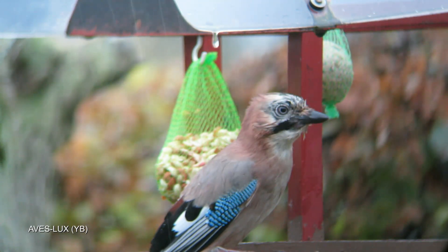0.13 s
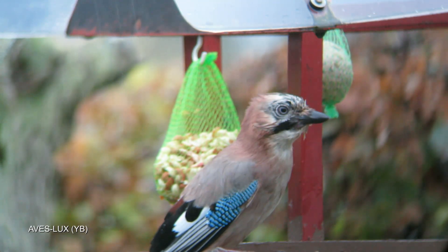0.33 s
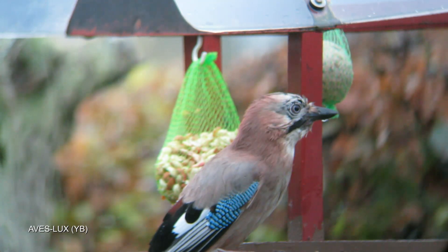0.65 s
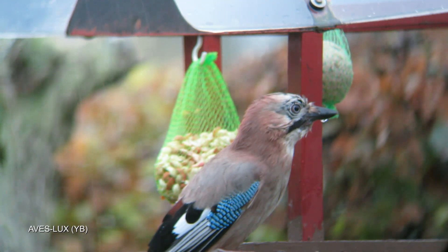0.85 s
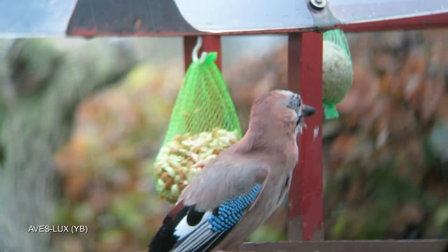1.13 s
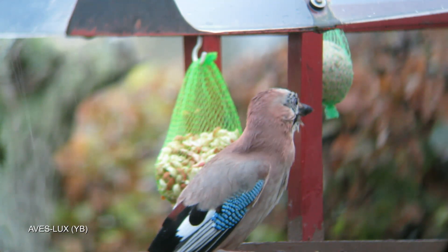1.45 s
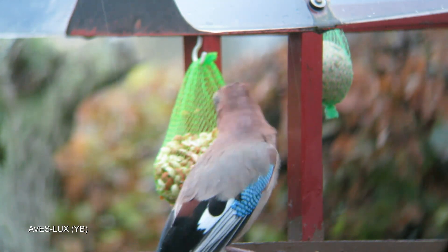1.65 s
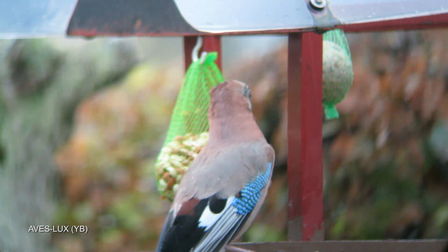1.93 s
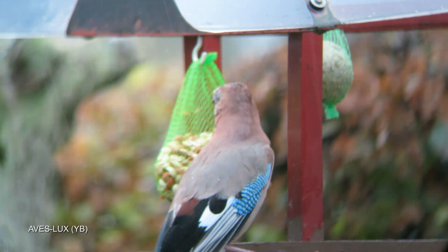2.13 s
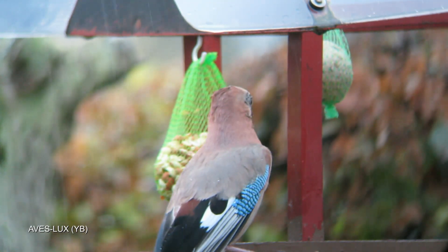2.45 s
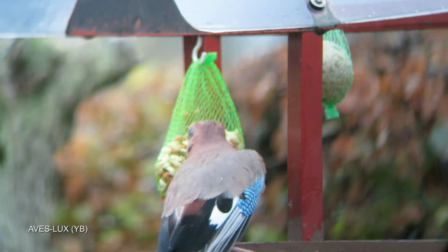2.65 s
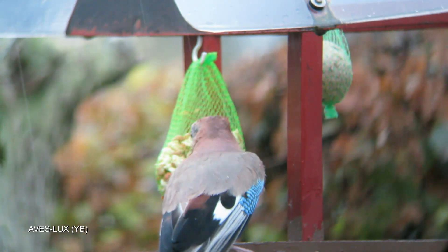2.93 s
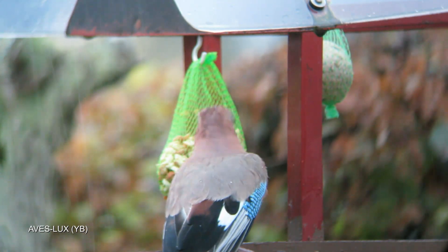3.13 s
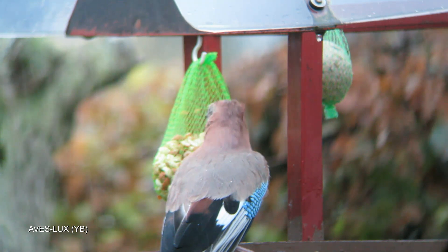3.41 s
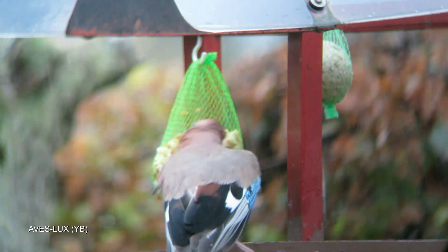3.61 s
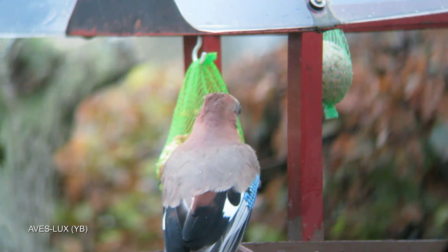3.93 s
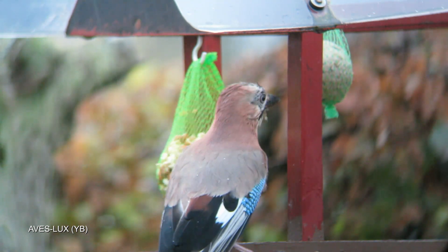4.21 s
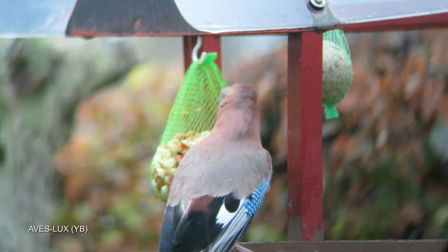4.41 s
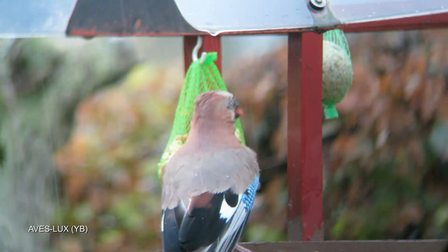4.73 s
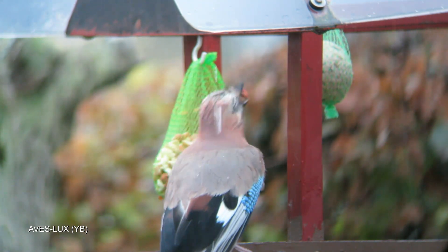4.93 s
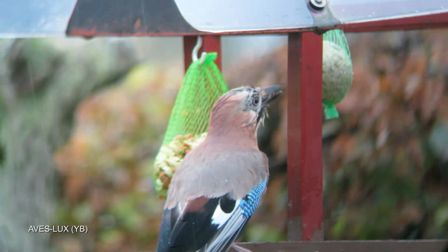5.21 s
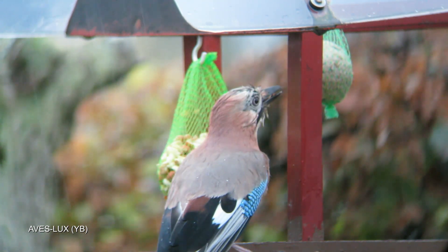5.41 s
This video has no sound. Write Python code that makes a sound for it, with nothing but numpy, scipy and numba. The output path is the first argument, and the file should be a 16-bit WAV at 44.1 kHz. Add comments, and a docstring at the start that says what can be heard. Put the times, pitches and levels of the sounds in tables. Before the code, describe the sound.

Outdoors in a quiet garden, loud raspy jay calls come singly and irregularly, each under half a second or slightly longer, tearing and nasal, ending in a rough rattle. Softer hoarse calls from another jay fill the gaps with long woodland reverberation. Faint drips, one tiny high bird peep late on, low hum and thin hiss complete the close recording.

```python
"""Jays screeching in a garden

The near jay gives six rasping calls, the first already under way: hoarse opening, rising buzz with
whistling partials, rattle. Both jays are a syrinx of partials and turbulence, coloured by spectra.
Another answers, smeared by trees. Drips and a peep are sine tones; a faint low tone arches far away.
Under it all lie filtered noise, wavering hum tones and a thin hiss of changing level."""
import sys
import numpy as np
from scipy import signal
from scipy.fft import rfft, irfft
from scipy.io import wavfile
from scipy.ndimage import uniform_filter1d
from numba import njit

SR = 44100
rng = np.random.default_rng(int(sys.argv[2]) if len(sys.argv) > 2 else 0)


def generate_wav(sig):
    """Save sig (samples, or channels by samples) to the path in sys.argv[1] as 16-bit PCM at SR."""
    pcm = np.round(np.clip(np.atleast_2d(sig).T, -1, 1) * 32767).astype(np.int16)
    wavfile.write(sys.argv[1], SR, pcm)


N = 245637
T = np.arange(N) / SR

# steady air spectrum, relative: freq_hz, gain_db
AIR_SPECTRUM = [(25, -2.5), (90, -9.5), (250, -2.5), (400, -10.5), (700, 3.5), (3000, 9), (8400, -15),
                (10800, -7.5), (12200, -36.5), (14000, -27.5)]
AIR_RMS_DB = -56.5
# hum tones, mean level before wavering: freq_hz, rms_db
HUM_TONES = [(100, -88), (150, -93), (232, -85), (268, -90)]
# high hiss, level before its trim: time_s, level_db
HISS_LEVEL = [(0.03, -66), (0.29, -78), (1.39, -66.5), (1.89, -80.5), (2.16, -69), (2.38, -82), (2.59, -66),
              (2.95, -68.5), (3.11, -75.5), (3.82, -69.5), (3.94, -63.5), (4.72, -76.5), (5.09, -69.5),
              (5.54, -66)]
# faint distant tone: time_s, pitch_hz
ARCH_PITCH = [(3.1, 512), (3.17, 561), (3.24, 600), (3.3, 577), (3.36, 570)]
# drips on the feeder, level before colouring: start_s, peak_db, ring_hz, t60_s
DRIP_EVENTS = [(.241, -25.5, 2130, .05), (3.362, -30, 2703, 0.007)]

# far jay's calls: start_s, length_s, level_db (before the trees), top_pitch_hz, treble_share_db
FAR_CALLS = [(.21, 0.21, -30.5, 309.1, -2.5), (.57, 0.37, -30, 301.5, -13.5), (1.1, .3, -32.5, 313.6, -4),
             (1.44, .33, -32.5, 273.6, -5.5), (2.31, 0.23, -33, 300, -4.5), (2.7, 0.24, -33.5, 304.8, -7),
             (3.338, 0.32, -30, 298.7, -5), (4.375, 0.4, -28, 305.4, -3), (4.93, 0.2, -28, 296.1, -6)]
# far jay's colour through the trees: freq_hz, gain_db
FAR_SPECTRUM = [(240, -55), (400, -53), (687, -39), (878, -20.5), (1180, -10.5), (1300, -11), (1450, -9.5),
                (2000, -6.5), (2380, -2.5), (2790, -5), (3040, -1), (3610, -3.5), (3940, -10),
                (4910, -15.5), (7550, -42), (9820, -97), (16600, -120)]
FAR_RISE_S, FAR_ATTACK_S, FAR_RELEASE_S = .15, .04, .008  # pitch climb; envelope edges
WOOD_T60_S, WOOD_TREBLE_T60_S = 1.85, 1.2  # ringing of the trees

# near jay's calls, level before swell, push and sag; treble added to the beak's share:
# start_s, opening_s, buzz_s, rattle_s, attack_s, fray_s, level_db, lock_pitch_hz, climb_hz_per_s,
# rattle_pitch_hz, rattle_drift_hz_per_s, treble_db, whistle_db
NEAR_CALLS = [(-.25, 0.1, .14, 0.2, .04, .11, -17.5, 311.3, 180.8, 335.7, -60, 3, -4.5),
              (.662, 0.11, .11, .305, 0.026, 0.0788, -20.5, 278.9, 190.2, 310.4, 50, 2, -3),
              (1.868, 0.12, 0.11, 0.21, 0.059, .19, -20.5, 274, 236.7, 319.7, 150, -1.5, 0.5),
              (2.445, .09, .11, .17, 0.072, .1, -19.5, 284.2, 150.6, 302, 40.5, -0.5, -1),
              (3.762, .108, .083, 0.16, 0.047, 0.0457, -18, 282.6, 154.8, 316.7, 60, -2, -0.5),
              (5.424, 0.072, 0.076, .2, 0.012, .12, -22, 279.8, 178.2, 314.8, 0, 5, 1)]
# narrow throat resonances that make even partials whistle, gain before whistle_db:
# centre_hz, width_hz, narrow_beak_db, wide_beak_db
WHISTLE_RESONANCES = [(1593, 130, 0.5, -6.5), (1953, 83, -8.5, 4.5), (2242, 280, -3, -6),
                      (2900, 66, -24, -4), (3350, 383, -15.5, -2.5), (3610, 86, -30, -9),
                      (4020, 110, -8.5, -18), (4210, 190, -22, -11.5)]
# near jay's throat and beak: freq_hz, gain_db
THROAT_SPECTRUM = [(240, -85.5), (400, -38), (704, -34), (946, -12), (1060, -14.5), (1570, -3), (1810, -8),
                   (1950, -3), (2320, 2.5), (3400, 0.5), (3890, -6.5), (4730, -5), (5290, -16), (6510, -21),
                   (7550, -37), (9820, -53.5), (16600, -120)]
OPENING_HZ = 244.2  # starting pitch of both jays' calls
LEAP_S, LOCK_S = .035, .035  # leap to the rattle pitch; locking of the buzz
OPENING_ROUGH, BUZZ_ROUGH, RATTLE_ROUGH = .64, .18, .85  # 0-1
BEAK_SNAP = .35  # share of the beak's closing that comes as the voice frays
SWELL_DB, PUSH_DB, SAG_DB, RELEASE_S = 3.5, 0.5, 0.5, 0.041  # swell, push on fraying, running out of air
NARROW_BEAK_HZ, WIDE_BEAK_HZ = 2450, 2912  # main throat resonance
NARROW_TREBLE_DB, WIDE_TREBLE_DB = -15.5, -5.5  # treble share before each call's treble_db
TOP_HZ = 15000  # microphone's upper limit


def undb(db):
    """Decibels to gain."""
    return 10 ** (np.asarray(db) / 20)


def unit(x):
    """Scale to rms 1."""
    return x / np.sqrt(np.mean(x ** 2))


def curves(rows):
    """Columns of a (time_s, ...) table, joined by straight lines."""
    time_s, *columns = np.transpose(rows)
    return [np.interp(T, time_s, column) for column in columns]


def current(rows):
    """Columns of an event table, each moment holding the row that started last."""
    rows = np.array(rows)
    index = np.maximum(np.searchsorted(rows[:, 0], T) - 1, 0)
    return rows[index].T


def gate(start_s, end_s, fade_s):
    """1 between two times, with sloping edges."""
    return np.clip(np.minimum(T - start_s, end_s - T) / fade_s + .5, 0, 1)


def ramp(start_s, length_s):
    """Rise from 0 to 1 in a given time."""
    return np.clip((T - start_s) / length_s, 0, 1)


def cycles(hz):
    """Phase in radians of a moving pitch."""
    return 2 * np.pi * np.cumsum(hz) / SR


def noise():
    """White noise."""
    return rng.standard_normal(N)


def wander(hz):
    """Low-passed random motion, rms 1."""
    return unit(signal.sosfilt(signal.butter(2, hz, fs=SR, output="sos"), noise()))


def steady(x):
    """Even out slow swells, keeping the rms near 1."""
    return x / np.sqrt(uniform_filter1d(x ** 2, size=900) + 1e-12)


def colour(x, points):
    """Filter by a (freq_hz, gain_db) spectrum, interpolated over log frequency."""
    hz, db = np.transpose(points)
    f = np.maximum(np.fft.rfftfreq(2 * N, 1 / SR), 1)
    gain = undb(np.interp(np.log(f), np.log(hz), db))
    return irfft(rfft(x, 2 * N) * gain)[:N]


def treble(x, hz):
    """High-pass without phase shift."""
    return signal.sosfiltfilt(signal.butter(3, hz, "high", fs=SR, output="sos"), x)


@njit
def resonate(x, hz, width_hz):
    """State-variable band-pass with a moving centre, gain 1 there."""
    y, band, low = np.empty(len(x)), 0., 0.
    for i in range(len(x)):
        g, damping = np.tan(np.pi * hz[i] / SR), width_hz / hz[i]
        v = (band + g * (x[i] - low)) / (1 + g * (g + damping))
        band = 2 * v - band
        low = low + 2 * g * v
        y[i] = damping * v
    return y


def brighten(x, share_db, split_hz):
    """Set the level of the part above split_hz relative to the rest; rms near 1."""
    top = treble(x, split_hz)
    return steady(steady(x - top) + undb(share_db) * steady(top))


def scatter(x, t60_s, build_s):
    """Dense echoes from trunks, leaves and walls: a decaying noise tail of unit energy."""
    tail = noise() * undb(-60 * T / t60_s) * (1 - np.exp(-T / build_s))
    return signal.fftconvolve(x, tail / np.sqrt(np.sum(tail ** 2)))[:N]


def note(points, db, waver, fade_s):
    """One thin wavering sine along (time_s, pitch_hz) points."""
    hz = curves(points)[0] * (1 + waver * wander(126))
    return undb(db) * gate(points[0][0], points[-1][0], fade_s) * np.sin(cycles(hz))


def background(hiss_trim_db=-2):
    """Quiet air, hum wavering in pitch and level, and a thin high hiss."""
    air = unit(colour(noise(), AIR_SPECTRUM)) * undb(AIR_RMS_DB)
    hum = 0
    for hz, db in HUM_TONES:
        gain = undb(db + 2 * wander(5)) * np.sqrt(2)
        hum = hum + gain * np.sin(cycles(hz * (1 + .015 * wander(15))))
    hiss = unit(colour(noise(), [(8000, -62.0), (10000, -4.5), (11500, 2.5),
                                 (12600, -6.0), (14000, -15.5), (15000, -22.5)]))
    return air + hum + hiss * undb(curves(HISS_LEVEL)[0] + hiss_trim_db)


def distant_arch():
    """A faint low tone that rises, then dips."""
    return note(ARCH_PITCH, db=-69, waver=0.02636, fade_s=0.12)


def drips():
    """Each drop rings as a decaying sine where it lands; the wet contact is soft."""
    out = 0
    for start_s, db, hz, t60_s in DRIP_EVENTS:
        age_s = np.maximum(T - start_s, 0)
        decay = undb(db - 60 * np.minimum(age_s / t60_s, 2))
        out = out + decay * np.sin(2 * np.pi * hz * age_s) * (age_s < 2 * t60_s)
    return colour(out, [(400, -41.5), (1000, 9.5), (4500, -1.5), (8000, -9)])


def peep():
    """One falling note of a small bird."""
    return note([(4.355, 5530), (4.41, 5440)], db=-61, waver=.012, fade_s=.03)


def syrinx(hz, rough, jitter, odd_db, rasp, flicker_db=2.5, tilt_db_per_octave=-2.57):
    """Strong and weak cycles in turn, turbulence on each; roughness shakes timing and size."""
    phase = cycles(hz * (1 + jitter * (rough + 0.0908) * wander(228.6)))
    buzz = 0
    for k in range(3, 18):
        # each partial flickers on its own; random phases spread the pulse over its cycle
        db = odd_db * (k % 2) + tilt_db_per_octave * np.log2(k) + flicker_db * wander(45)
        buzz = buzz + undb(db) * np.cos(k * phase + rng.uniform(0, 2 * np.pi))
    puffs = noise() * (1 + 0.52 * np.cos(2 * phase))
    puffs = colour(puffs, [(900, -0.51), (2000, 0.3), (3500, -3.6)])
    voice = unit(buzz) * (1.25 - rough) + rasp * (rough + .45) * unit(puffs)
    return steady(voice * undb(0.58 * rough * wander(260)))


def far_jay():
    """A hoarse rising call, smeared by the trees between; its treble rings shorter."""
    start_s, length_s, db, top_hz, share_db = current(FAR_CALLS)
    hz = OPENING_HZ + (top_hz - OPENING_HZ) * ramp(start_s, FAR_RISE_S)
    source = syrinx(hz, rough=.58, jitter=.04, odd_db=-2.5, rasp=1.55)
    voice = colour(source, FAR_SPECTRUM)
    envelope = ramp(start_s, FAR_ATTACK_S) * (1 - ramp(start_s + length_s, FAR_RELEASE_S))
    voice = brighten(voice, share_db, split_hz=3322) * envelope * undb(db)
    top = treble(voice, 4840)
    body_echoes = scatter(voice - top, WOOD_T60_S, build_s=0.0016)
    return body_echoes + scatter(top, WOOD_TREBLE_T60_S, build_s=0.0018)


def screeches():
    """Near jay's pitch, roughness, beak opening and loudness through each call's three stages."""
    (start_s, opening_s, buzz_s, rattle_s, attack_s, fray_s, db, lock_hz, climb_hz_per_s,
     rattle_hz, drift_hz_per_s, treble_db, whistle_db) = current(NEAR_CALLS)
    lock_s = start_s + opening_s
    break_s = lock_s + buzz_s
    opened, spent = ramp(start_s, opening_s), ramp(break_s, rattle_s)
    frayed = np.sin(np.pi / 2 * ramp(break_s, fray_s)) ** 2

    climb_hz = OPENING_HZ + (lock_hz - OPENING_HZ) * opened
    climb_hz = climb_hz + climb_hz_per_s * buzz_s * ramp(lock_s, buzz_s)
    end_hz = rattle_hz + drift_hz_per_s * rattle_s * spent
    hz = climb_hz + (end_hz - climb_hz) * ramp(break_s, LEAP_S)

    locked = ramp(lock_s - LOCK_S / 2, LOCK_S)
    rough = OPENING_ROUGH + (BUZZ_ROUGH - OPENING_ROUGH) * locked
    rough = rough + (RATTLE_ROUGH - BUZZ_ROUGH) * frayed

    envelope = ramp(start_s, attack_s) * (1 - ramp(break_s + rattle_s - RELEASE_S, RELEASE_S))
    swell_db = -SWELL_DB * (1.5 - ramp(start_s, opening_s + buzz_s))
    loudness = envelope * undb(db + swell_db + PUSH_DB * frayed - SAG_DB * spent ** 2)
    gape = opened - BEAK_SNAP * frayed - (1 - BEAK_SNAP) * spent
    return hz, np.clip(rough, 0, 1), gape, loudness, treble_db, whistle_db


def whistles(hz, rough, gape, jitter, flutter_db, fray_db=-6):
    """Even partials stand out gliding through throat resonances whose gains follow the beak."""
    phase = cycles(hz * (1 + jitter * (rough + 0.1) * wander(158.7)))
    resonances = [(centre_hz, width_hz, undb(narrow_db + (wide_db - narrow_db) * gape))
                  for centre_hz, width_hz, narrow_db, wide_db in WHISTLE_RESONANCES]
    out = 0
    for k in range(4, 17, 2):
        caught = sum(gain / (1 + (2 * (k * hz - centre_hz) / width_hz) ** 2)
                     for centre_hz, width_hz, gain in resonances)
        out = out + caught * np.sqrt(2) * np.sin(k * phase + rng.uniform(0, 2 * np.pi))
    return out * undb(fray_db * rough ** 2 + flutter_db * wander(71))


def squeal(centre_hz, rough, rattle_hz=121.8, swing=0.13):
    """A breaking voice throws one loud partial up and down around a centre."""
    beat = cycles(rattle_hz * (1 + .35 * wander(40)))
    hz = centre_hz * (1 + swing * (.7 * np.sin(beat) + wander(250)))
    return rough ** 2 * unit(np.sin(cycles(hz)) * (1 + .7 * np.cos(beat)))


def near_jay(buzz_db=-1.0, resonance_db=-3, width_hz=4500.0, squeal_db=0.5):
    """Syrinx through a throat that brightens as the beak opens and sinks as each call breaks up."""
    hz, rough, gape, loudness, treble_db, whistle_db = screeches()
    centre_hz = NARROW_BEAK_HZ + (WIDE_BEAK_HZ - NARROW_BEAK_HZ) * gape
    share_db = NARROW_TREBLE_DB + (WIDE_TREBLE_DB - NARROW_TREBLE_DB) * gape + treble_db
    source = syrinx(hz, rough, jitter=.036, odd_db=-3, rasp=1.35)
    voice = colour(source, THROAT_SPECTRUM)
    voice = steady(voice + undb(resonance_db) * resonate(voice, centre_hz, width_hz))
    breaking = colour(squeal(0.71 * centre_hz, rough),
                      [(700, -44.5), (1300, -3.5), (4000, -7.0), (6000, -37.0)])
    voice = voice + undb(squeal_db) * breaking
    voice = brighten(voice, share_db, split_hz=4230) * undb(buzz_db)
    whistling = whistles(hz, rough, gape, jitter=0.0321, flutter_db=2.74)
    return loudness * (voice + undb(whistle_db) * whistling)


def scene():
    """All sources; the garden throws back the near ones as coloured echoes."""
    near = near_jay() + drips() + peep()
    echoes = colour(scatter(near, t60_s=0.97, build_s=0.0047),
                    [(900, -6.5), (2200, -9), (3500, -5.5), (5000, -11.5), (9000, -4.0)])
    return (background() + distant_arch() + far_jay() + near + echoes)[None]


def record(dry, bend=0.043):
    """The microphone's slight square-law bend adds faint difference tones; the top is cut."""
    bent = dry + bend * treble(dry ** 2, 20)
    return signal.sosfilt(signal.ellip(8, .2, 70, TOP_HZ, fs=SR, output="sos"), bent)


dry = scene()
out = record(dry)
generate_wav(out)
```